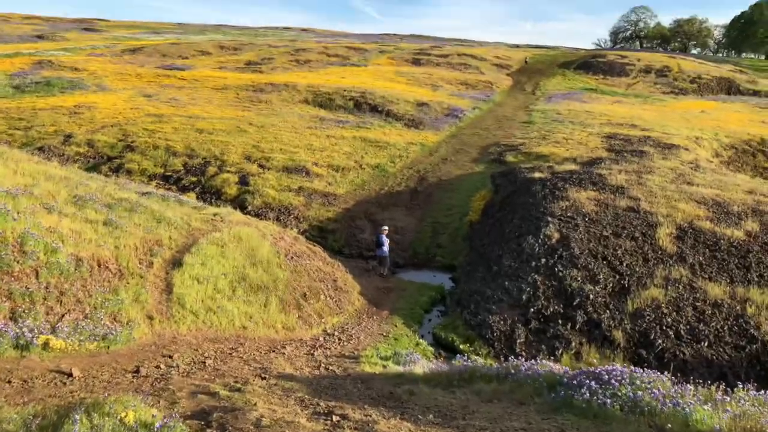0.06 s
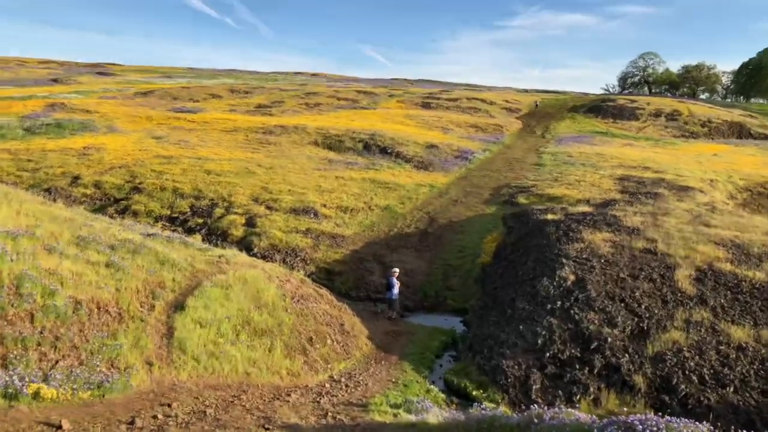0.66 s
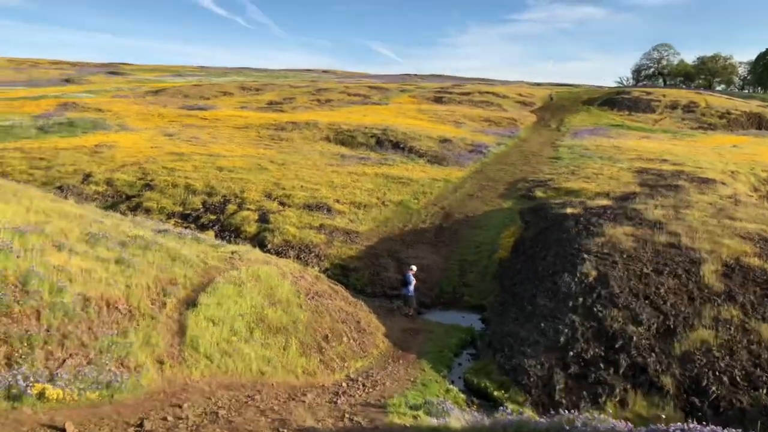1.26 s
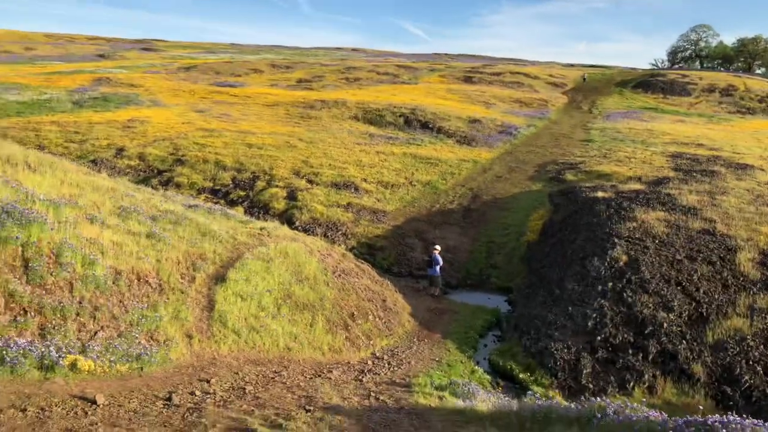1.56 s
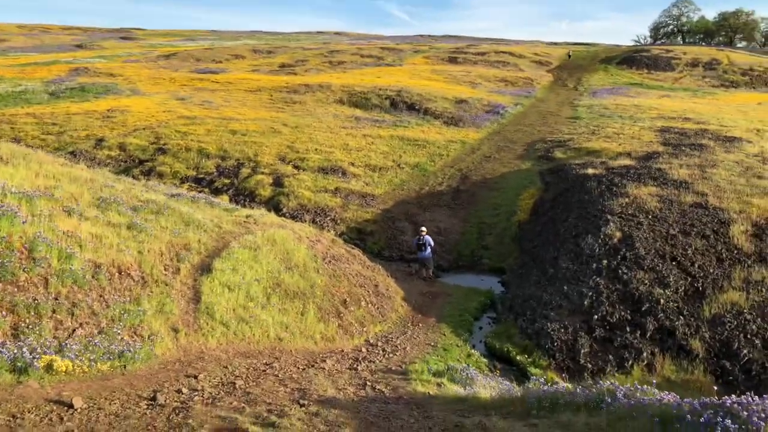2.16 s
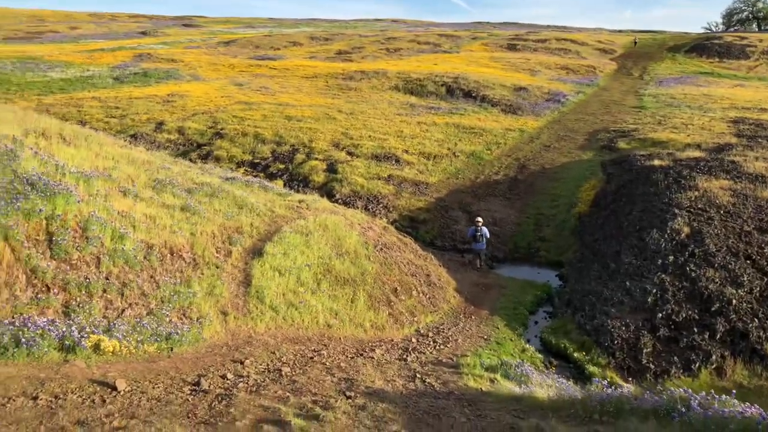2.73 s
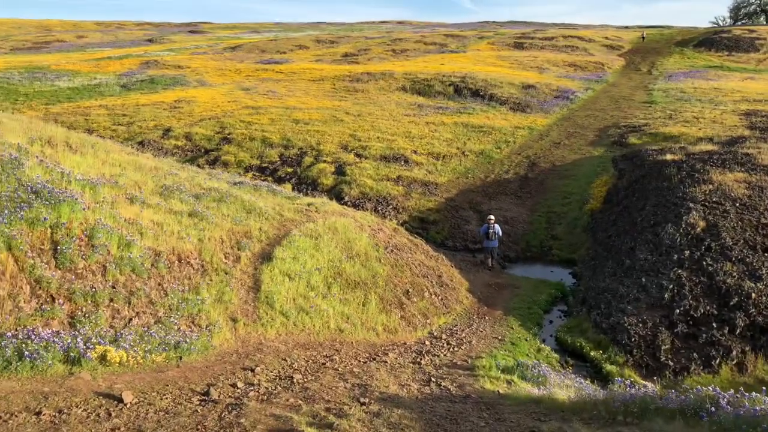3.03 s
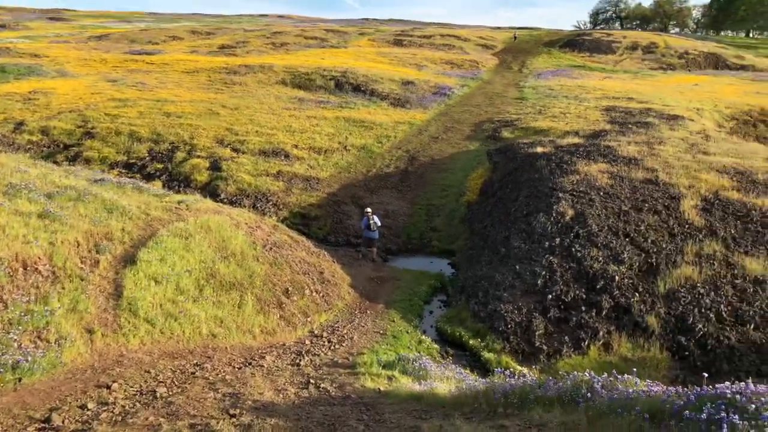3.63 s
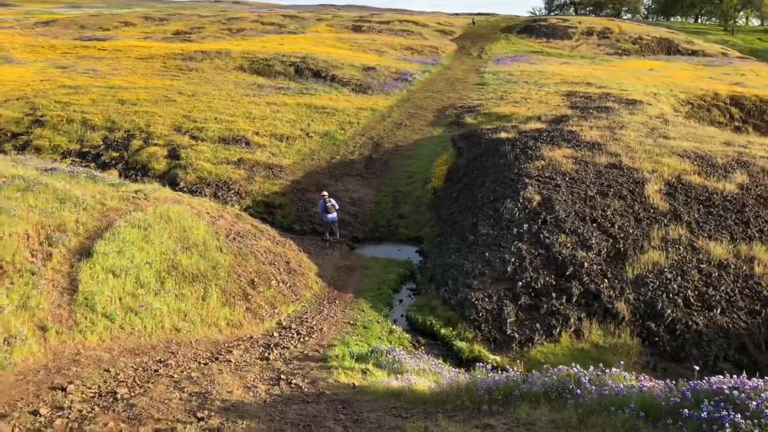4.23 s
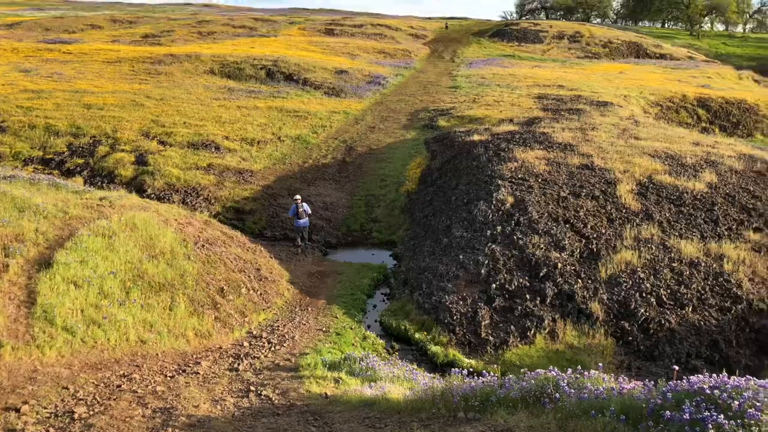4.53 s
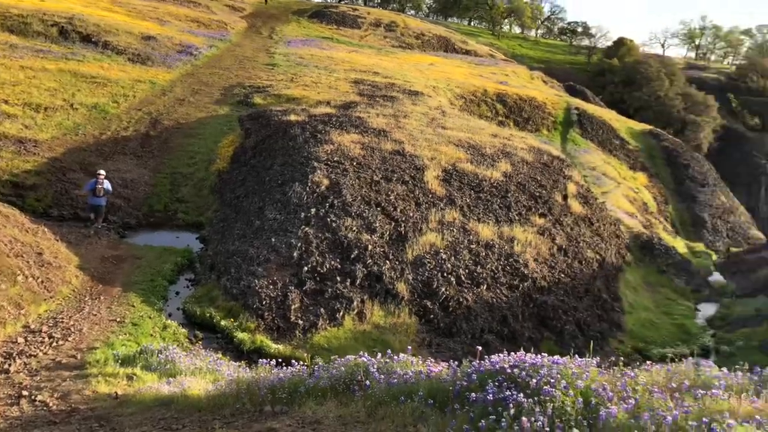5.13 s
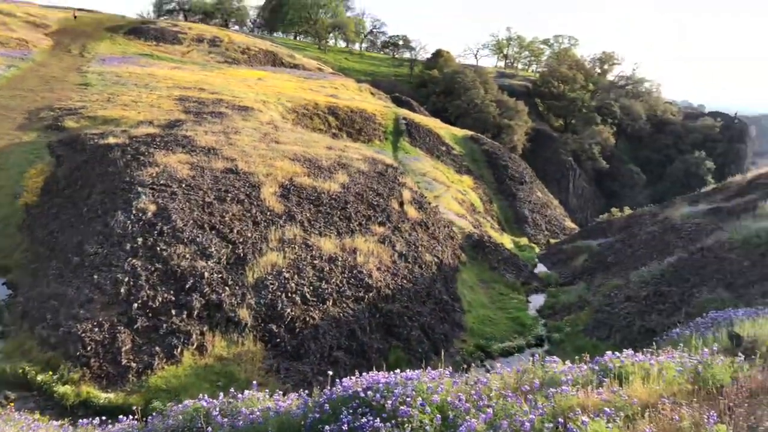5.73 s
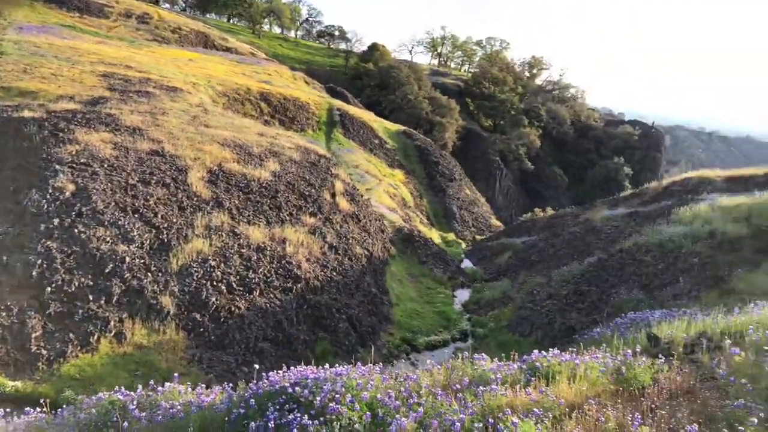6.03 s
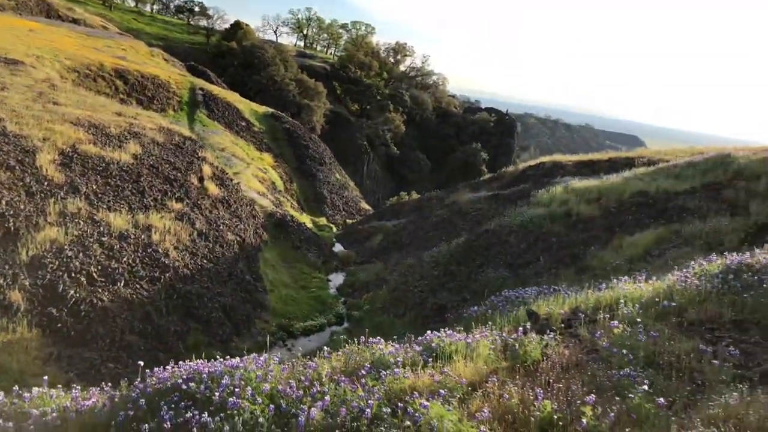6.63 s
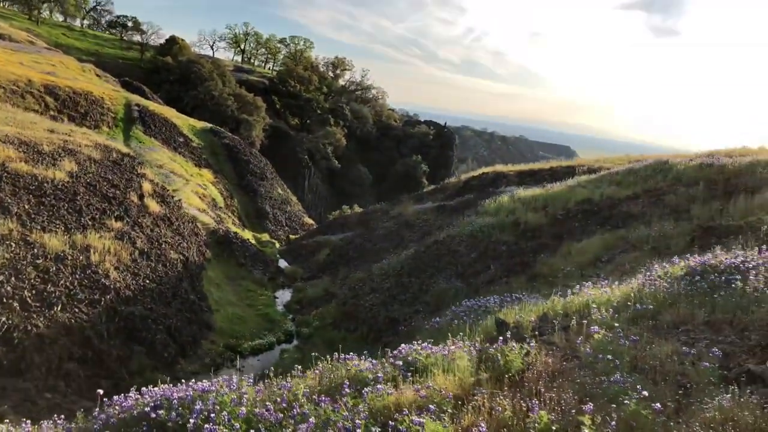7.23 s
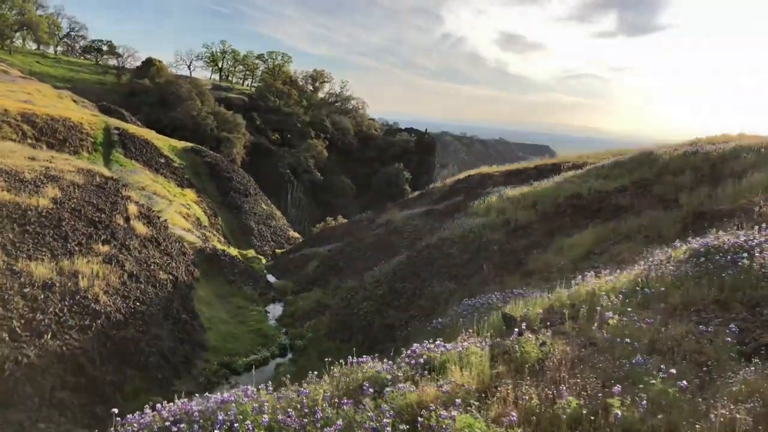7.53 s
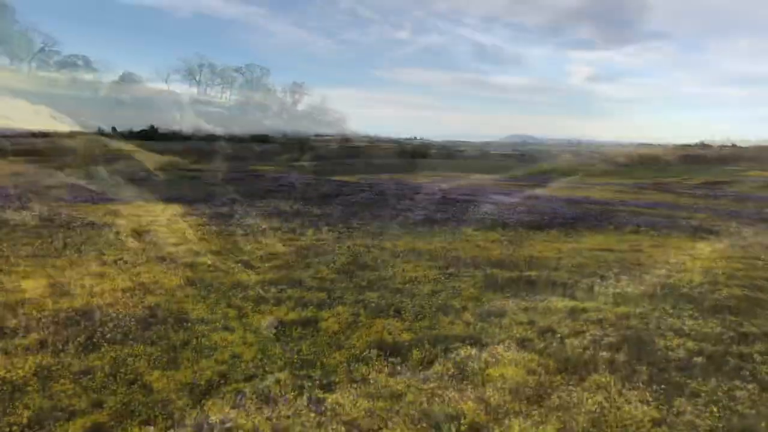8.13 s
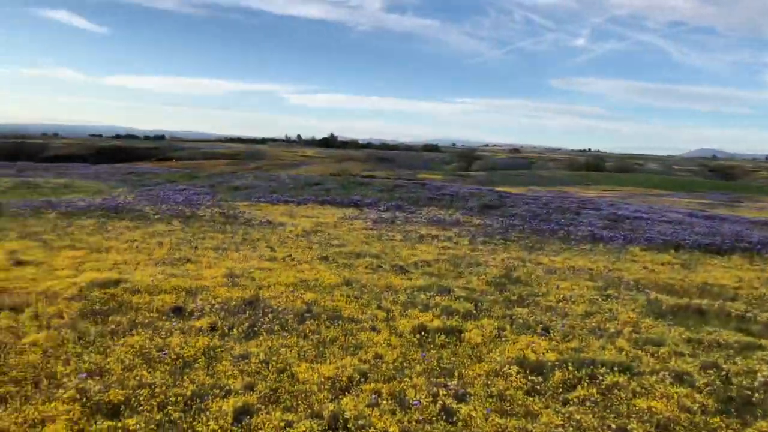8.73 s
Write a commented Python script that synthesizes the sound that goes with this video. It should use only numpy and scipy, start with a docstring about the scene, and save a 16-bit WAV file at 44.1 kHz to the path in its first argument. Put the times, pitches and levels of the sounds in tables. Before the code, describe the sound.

From the start, four tree frogs call close by in turn, about four raspy two-note croaks a second, the second note slightly higher than the first. Behind them a small creek trickles softly and a faint frog chorus swells and fades. The microphone is carried along a stony path: dull, lightly crunching footsteps come about twice a second, with small snaps and rustles of dry grass, clearest around 4.1 and 5.2 seconds. A very faint, thin hiss flutters at the start and near 1.5 and 3 seconds. Brief puffs of wind touch the microphone at about 2 and 3.2 seconds, and a stronger gust comes at 6.5. The croaks grow somewhat louder until about 7 seconds. The steps stop before 8 seconds and the frogs fade just after, with one barely audible, distant bird whistle. Low wind rumble and buffeting build, loudest from 8.2 seconds to the end near 8.9.

```python
"""Tree frogs along a creek

Tree frogs call "rib-bit" in a grassy gully, over a small creek and a fainter chorus. Each note is a
train of short pulses of a tone whose second harmonic is lifted by the vocal sac. Someone carries the
microphone along a stony path through dry grass; wind buffets it more and more toward the end.
Early on a faint, thin hiss flutters about every second and a half; late, a far bird whistles once."""
import sys
import numpy as np
from scipy import signal
from scipy.fft import rfft, irfft, next_fast_len
from scipy.io import wavfile
from scipy.ndimage import uniform_filter1d, map_coordinates

SR = 44100
rng = np.random.default_rng(int(sys.argv[2]) if len(sys.argv) > 2 else 0)


def output_pcm(signal):
    """Save a mono or channel-first signal as 16-bit PCM at the path in sys.argv[1].

    Samples are clipped to [-1, 1] before scaling.
    """
    pcm = np.clip(np.atleast_2d(signal).T, -1, 1) * 32767
    wavfile.write(sys.argv[1], SR, np.round(pcm).astype(np.int16))


N = 392049

# spectrum of the creek and far air: f/Hz, relative density/dB
CREEK_SPECTRUM = [(20, -3), (60, -2), (200, 1), (330, 6), (540, -4), (880, -10), (1270, -10), (1950, -13.5),
                  (3100, -16), (4500, -18), (7000, -23), (9500, -27.5), (15500, -29)]
# loudness of the creek and far air: t/s, level/dB
CREEK_LEVEL = [(0, -59.5), (3.9, -59), (4.6, -60.5), (7.8, -60.5), (8.35, -63), (8.89, -63)]
# spectrum of wind on the microphone: f/Hz, relative density/dB
WIND_SPECTRUM = [(15, -32), (30, -24), (55, 2), (120, 0.5), (180, -4), (260, -14), (400, -37), (700, -47),
                 (1500, -77), (4000, -90)]
# steady wind, rising toward the end: t/s, level/dB
STEADY_WIND = [(0, -63.5), (5.7, -64.5), (6.45, -50), (6.95, -61), (7.4, -52), (8.08, -50), (8.38, -38.5),
               (8.89, -34)]
# gusts on top of it: crest t/s, duration/s, level/dB
GUSTS = [(2.019, .16, -50.5), (3.207, 0.15, -45), (6.53, .24, -37.5), (6.749, 0.1, -50), (7.3, 0.14, -42),
         (7.46, 0.079, -45), (7.77, 0.24, -37.5), (7.951, .11, -40), (8.189, 0.18, -36),
         (8.64, 0.13, -30.5)]
# the hardest buffets: t/s, relative peak/dB
BUFFETS = [(2.023, -38), (3.188, -38), (6.563, -36), (7.75, -31), (7.8, -33), (8.158, -30), (8.225, -23),
           (8.319, -25), (8.39, -26), (8.434, -27), (8.494, -21), (8.531, -21), (8.63, -18.5), (8.861, -26)]
# faint, thin, fluttering hisses: t/s, duration/s, level/dB
HISSES = [(0, .13, -67), (1.49, .31, -69), (2.95, .13, -67)]
# partials of a frog's voice: harmonic number, relative level/dB
FROG_HARMONICS = [(1, -16), (2, 7), (3, -20), (4, -35), (5, -53), (6, -45), (8, -48)]
# loudness of the far chorus: t/s, level/dB
CHORUS_LEVEL = [(0, -58), (.4, -77), (1.58, -61), (2, -76), (2.8, -66), (3.2, -76), (3.75, -64), (4.6, -76),
                (7.3, -80), (8, -69), (8.4, -90)]
# near frogs by name: rib lead/s, rib duration/s, rib f/Hz, bit f/Hz, bit pulse depth (0-1), bit echo/dB
FROG_VOICES = {"leader": (.097, .057, 1240, 1322, .64, -7), "answerer": (.122, .078, 1250, 1320, .66, -7),
               "piper": (.094, 0.0468, 1230, 1330, .2, -14), "low": (.089, .044, 1220, 1244, .35, -10)}
# calls of four frogs taking turns: bit t/s, bit duration/s, rib level/dB, bit level/dB, frog's name
CALLS = [(.212, .051, -52.5, -47.5, "leader"), (.595, .05, -54, -52, "answerer"),
         (0.885, .025, -57, -60, "low"), (1.011, .055, -53, -48.5, "leader"),
         (1.397, .032, -53.5, -50.5, "answerer"), (1.519, .02, -63, -54, "piper"),
         (1.764, .044, -53, -45.5, "leader"), (1.851, .026, -64, -57.5, "low"),
         (2.259, .035, -53.5, -46.5, "answerer"), (2.446, .019, -57, -49, "piper"),
         (2.654, .049, -51.5, -45, "leader"), (2.774, .028, -60, -56, "low"),
         (3.071, .044, -54.5, -51, "answerer"), (3.306, .024, -59.5, -49.5, "piper"),
         (3.473, .042, -49.2, -45.1, "leader"), (3.66, .032, -59, -52.9, "low"),
         (3.921, .037, -54.5, -49, "answerer"), (4.175, .021, -56.5, -48.5, "piper"),
         (4.311, .034, -47.5, -41.5, "leader"), (4.505, .024, -59, -53, "low"),
         (4.923, .055, -47.5, -42.5, "answerer"), (5.01, .019, -60, -48, "piper"),
         (5.368, .026, -58.5, -52, "low"), (5.643, .04, -47, -41, "leader"),
         (5.871, .021, -58, -48.5, "piper"), (6.099, .041, -51.5, -45.5, "answerer"),
         (6.212, .026, -67, -57.5, "low"), (6.475, .032, -48, -39.5, "leader"),
         (6.666, .028, -59, -50.5, "piper"), (7.086, .035, -44, -37, "answerer"),
         (7.571, .03, -58.5, -53, "piper"), (7.766, .043, -46, -42, "leader"),
         (7.949, .021, -62, -56.5, "low"), (8.157, .034, -51.5, -51, "answerer"),
         (8.457, .018, -75, -71.5, "piper"), (8.521, .04, -82, -73, "low")]
# footfalls, about two a second, with a few stumbles: t/s, relative level/dB, relative crunch/dB
STEPS = [(.125, -41, -13), (.675, -32, -13), (.702, -38, -10), (.87, -43, -22), (.952, -37, -12),
         (1.163, -39, -11), (1.208, -42.5, -11), (1.803, -45, -7.5), (2.366, -42, -13), (2.867, -43, -6),
         (2.944, -40.5, -9), (3.482, -37, -11.5), (4.005, -35, -6), (4.519, -46, 1), (5.041, -40, -11.5),
         (5.689, -33.5, -12), (6.234, -41.5, -10), (6.86, -36, -18.5), (7.225, -42, -8),
         (7.516, -35, -16.5)]
# the loudest snaps of dry stalks: t/s, relative peak/dB, relative treble/dB
STALK_SNAPS = [(.151, -49, -24), (.828, -47, -19), (.8974, -52, -10), (1.818, -52, -22), (2.0782, -45, -27),
               (2.8684, -46, -21), (3.058, -47, -28), (3.114, -51.5, 6), (4.135, -42, -16),
               (4.1985, -49, 8), (5.236, -41.5, -16), (5.258, -48, 9), (5.2963, -52, 3),
               (6.9344, -48.5, -24)]
# rustles of grass: t/s, duration/s, level/dB
RUSTLES = [(4.127, 0.075, -60), (5.219, 0.075, -61.5), (8.639, 0.18, -68.5), (8.702, 0.061, -61.5),
           (8.783, 0.049, -62), (0.634, 0.17, -67.5), (1.146, 0.039, -67), (3.553, 0.16, -66),
           (7.9, 0.33, -69)]
# spectrum of a rustle: f/Hz, relative density/dB
RUSTLE_SPECTRUM = [(300, -9), (900, 4.5), (2200, 2.5), (4000, -4), (6200, -4), (8500, -16), (15000, -16)]
# a far bird's note: t/s, duration/s, level/dB, start f/Hz, end f/Hz
BIRD_NOTE = (8.35, .05, -76, 5200, 4400)


def gain_of(db):
    """Amplitude ratio: a factor of ten for every 20 dB."""
    return 10 ** (np.asarray(db) / 20)


def unit_rms(x):
    """Normalisation to an rms of 1."""
    return x / np.sqrt(np.mean(x ** 2) + 1e-20)


def add(mix, s, sound):
    """Superposition: a sound joins the mix at s seconds."""
    part = mix[max(round(s * SR), 0):][:len(sound)]
    part += sound[:len(part)]


def curve(rows):
    """Linear interpolation of (t/s, value) rows over the scene."""
    return np.interp(np.arange(N) / SR, *np.transpose(rows))


def noise(spectrum, size):
    """Spectral shaping: white noise weighted by (f/Hz, level/dB) rows, at an rms of 1."""
    hz, db = np.transpose(spectrum)
    full = next_fast_len(size)
    shape = gain_of(np.interp(np.log(np.fft.rfftfreq(full, 1 / SR) + 1), np.log(hz), db))
    return unit_rms(irfft(rfft(rng.standard_normal(full)) * shape, full)[:size])


def wander(size, per_s):
    """Random drift of rms about 1: a spline through per_s Gaussian values a second."""
    at = np.arange(size) / SR * per_s + 1 + rng.random()
    return map_coordinates(rng.standard_normal(int(at[-1]) + 4), [at], order=2, mode="nearest")


def band(x, low_hz, high_hz, order=2):
    """Causal Butterworth band-pass."""
    sections = signal.butter(order, [low_hz, min(high_hz, SR / 2 - 1)], "band", fs=SR, output="sos")
    return signal.sosfilt(sections, x)


def creek(gurgle_top_hz=1100):
    """Random modulation of noise, band by band: the water's low bands gurgle, its hiss is smoother."""
    hz, _, spectra = signal.stft(noise(CREEK_SPECTRUM, N), SR, nperseg=1024)
    patches = uniform_filter1d(rng.standard_normal(spectra.shape), size=4, axis=0)
    patches = unit_rms(uniform_filter1d(patches, size=5, axis=1))
    gurgle_db = 1.04 + 2.5 * np.exp(-(hz[:, None] / gurgle_top_hz) ** 2)
    wash = signal.istft(spectra * gain_of(gurgle_db * patches), SR, nperseg=1024)[1][:N]
    return unit_rms(wash) * gain_of(curve(CREEK_LEVEL) + .9 * wander(N, 12))


def wind_level():
    """Amplitude envelope of the wind: the steady part plus a smooth swell for each gust."""
    level = gain_of(curve(STEADY_WIND))
    for s, length, db in GUSTS:
        add(level, s - length / 2, gain_of(db) * np.hanning(int(length * SR)))
    return level


def damped_swing(excess_hz, end_hz, fall_s, decay_s, rough):
    """Damped oscillation: a push of air whose unsteady frequency sinks as it dies."""
    t = np.arange(SR // 12) / SR
    hz = (end_hz + excess_hz * np.exp(-t / fall_s)) * gain_of(rough * wander(len(t), 514))
    swing = np.sin(2 * np.pi * np.cumsum(hz) / SR) * np.exp(-t / decay_s) * (1 - np.exp(-t / 0.0021))
    return swing / abs(swing).max()


def buffet():
    """Pressure transient at the microphone: a round push of air with a short flutter."""
    push = damped_swing(excess_hz=272, end_hz=116.6, fall_s=0.0053, decay_s=0.013, rough=2.42)
    t = np.arange(len(push)) / SR
    flutter = band(rng.standard_normal(len(t)) * np.exp(-t / 0.0078), 256, 580, order=3)
    return push + gain_of(-8.5) * flutter / abs(flutter).max()


def wind(eddies=150, onset_db=-40):
    """Turbulence: the stronger the wind, the more its rumble breaks into separate buffets."""
    rumble, level = noise(WIND_SPECTRUM, N), wind_level()
    rumble /= np.sqrt(uniform_filter1d(rumble ** 2, size=3000))  # flatten the noise's own envelope
    rumble *= level * gain_of(-2.2 + 3.7 * wander(N, 45))
    buffets = np.zeros(N)
    for s, db in BUFFETS:
        add(buffets, s, gain_of(db - 2.0) * buffet())
    for at in ((np.arange(eddies) + rng.random(eddies)) * N / eddies).astype(int):
        turbulence = level[at] / (level[at] + gain_of(onset_db))
        add(buffets, at / SR, gain_of(0.5) * level[at] * turbulence * buffet())
    return rumble + band(buffets, 30, 660, order=3)


def thin_hisses(pulses_per_s=90):
    """Amplitude modulation of narrow-band noise: faint, fluttering hisses near 4.6 kHz."""
    out = np.zeros(N)
    for s, length, db in HISSES:
        t = np.arange(int(length * SR)) / SR
        pulses = 1 + .5 * np.sin(2 * np.pi * pulses_per_s * t)
        hiss = band(rng.standard_normal(len(t)), 4350, 4850)
        add(out, s, gain_of(db) * unit_rms(hiss * pulses * signal.windows.tukey(len(t), .6)))
    return out


def frog_note(length, hz, depth, pulses_per_s, glide, rasp, puff_db):
    """Pulse modulation of a rising harmonic tone: each pulse starts hard and rich, then rounds off."""
    progress = np.linspace(0, 1, int(length * SR))
    size = len(progress)
    pulse_rate = pulses_per_s * (1 + .035 * rng.standard_normal() + .03 * wander(size, 80))
    pulse_count = np.cumsum(pulse_rate) / SR
    pulse_phase = pulse_count % 1
    pulse = np.sin(np.pi * pulse_phase ** 0.48) ** 2
    detune = rng.standard_normal(size=64)[pulse_count.astype(int)]  # each pulse has its own pitch
    bend = 0.023 * (.5 - pulse_phase) + .017 * detune
    pitch = hz * (1 + glide * (progress - .5) + depth * bend + rasp * wander(size, 502))
    cycles = np.cumsum(pitch) / SR + rng.random()
    richness = 1 + 4.1 * depth * (1 - 2 * pulse_phase) * (1.3 - progress)  # greatest in early pulses
    tone = sum(gain_of(db) * (1 if k == 2 else richness) * np.sin(2 * np.pi * k * cycles)
               for k, db in FROG_HARMONICS)
    # the vocal folds snap open noisily
    puffs = unit_rms(band(rng.standard_normal(size), 2400, 4400)) * np.exp(-pulse_phase / .5)
    voice = tone * (1 - depth + depth * pulse) + gain_of(puff_db) * depth * puffs
    return progress, voice * gain_of(1.26 * wander(size, 113))


def rib(length, hz):
    """Slow attack, quick decay: the deeply pulsed first note of a call."""
    progress, sound = frog_note(length, hz, depth=0.89, pulses_per_s=133,
                                glide=0.065, rasp=0.0333, puff_db=-13.5)
    return unit_rms(sound * np.interp(progress, [0, .08, .62, .85, 1], [0.1, 0.15, 1, .75, 0.0]))


def gully(x, t60, wet_db):
    """Reverberation: scattered reflections from rocks and banks fall by 60 dB in t60 seconds."""
    t = np.arange(SR // 2) / SR
    taps = rng.standard_normal(len(t)) * (rng.random(len(t)) < 2000 / SR)
    taps *= (t > .004) * gain_of(-60 * t / t60)
    return x + gain_of(wet_db) * signal.oaconvolve(x, taps / np.linalg.norm(taps))[:len(x)]


def chorus(count=200):
    """Incoherent summation: the notes of many far frogs, blurred by reverberation."""
    out = np.zeros(N)
    for when, pitch, strength in rng.random((count, 3)):
        add(out, when * N / SR, gain_of(10 * strength) * rib(0.0803, 1170 + 130 * pitch))
    return unit_rms(gully(out, t60=0.13, wet_db=-2.0)) * gain_of(curve(CHORUS_LEVEL))


def echoing(sound, t60, wet_db):
    """Reverberation at constant energy: a note is spread out by its own echoes from the gully."""
    wet = gully(np.pad(sound, (0, SR // 2)), t60, wet_db)
    return wet * np.linalg.norm(sound) / np.linalg.norm(wet)


def bit(length, hz, depth):
    """Quick attack: the second note of a call, whose rasp grows with the depth of its pulsing."""
    progress, sound = frog_note(length, hz, depth, pulses_per_s=122,
                                glide=0.043, rasp=0.047 * depth, puff_db=-13.0)
    return unit_rms(sound * np.interp(progress, [0, .08, .45, .78, 1], [0.25, 0.75, 0.97, 0.72, 0.015]))


def near_frogs():
    """Antiphony: four frogs call "rib-bit" in turn, the second note a little higher than the first."""
    out = np.zeros(N)
    for s, bit_s, rib_db, bit_db, frog in CALLS:
        lead_s, rib_s, rib_hz, bit_hz, depth, echo_db = FROG_VOICES[frog]
        tuning = 1 + .004 * rng.standard_normal()
        first = echoing(rib(rib_s, rib_hz * tuning), t60=0.12, wet_db=-1.5)
        second = echoing(bit(bit_s, bit_hz * tuning, depth), t60=0.13, wet_db=echo_db)
        add(out, s - lead_s, gain_of(rib_db) * first)
        add(out, s, gain_of(bit_db) * second)
    return out


def footfall(crunch_db):
    """Impact and friction: a dull thud, and small stones grinding in clumps under it."""
    thud = damped_swing(excess_hz=705, end_hz=180.6, fall_s=0.00204, decay_s=0.0099, rough=2.83)
    t = np.arange(len(thud)) / SR
    stones = rng.standard_normal(len(t)) * (rng.random(len(t)) < 2500 / SR)
    clumps = gain_of(5.9 * wander(len(t), 187))
    pressure = (1 - np.exp(-t / 0.0042)) * (np.exp(-t / 0.0037) + 0.046 * np.exp(-t / 0.041))
    crunch = band(stones * clumps * pressure, 450, 1550)
    return thud + gain_of(crunch_db + 11) * crunch / abs(crunch).max()


def snap(treble_db):
    """Brittle fracture: grit or a dry stalk breaks with a burst and a brief trail of crackles."""
    t = np.arange(SR // 20) / SR
    crackles = 0.48 * np.exp(-t / 0.0098) * (rng.random(len(t)) < 5000 / SR)
    burst = (1 - np.exp(-t / 0.00031)) * np.exp(-t / 0.0014)
    fracture = rng.standard_normal(len(t)) * (burst + crackles)
    sound = band(fracture, 1750, 3460, order=1) + gain_of(treble_db + 0.5) * band(fracture, 4500, 22900)
    return sound / abs(sound).max()


def walking(until_s, loose_stones=55):
    """Successive impacts: heel, grit and sole at each step, with loose stones shifting in between."""
    out = np.zeros(N)
    for s, db, crunch_db in STEPS:
        add(out, s, gain_of(db - 2.5) * footfall(crunch_db))  # heel
        add(out, s, gain_of(db + crunch_db - 1) * snap(treble_db=-26))  # grit
        add(out, s + .032, gain_of(db - 12.5) * footfall(crunch_db=-8.5))  # sole
    for when, strength in rng.random((loose_stones, 2)):
        add(out, when * until_s, gain_of(-66.0 + 10 * strength) * footfall(crunch_db=-2.5))
    return out


def dry_grass(until_s, faint_snaps=150):
    """Fracture and friction: stalks snap and rustle close by, with faint crackles between them."""
    out = np.zeros(N)
    for s, db, treble_db in STALK_SNAPS:
        add(out, s, gain_of(db + 6.5) * snap(treble_db))
    for when, strength in rng.random((faint_snaps, 2)):
        add(out, when * until_s, gain_of(-57 + 10 * strength ** 2) * snap(treble_db=-17))
    for s, length, db in RUSTLES:
        size = int(length * SR)
        rustle = noise(RUSTLE_SPECTRUM, size) * gain_of(4.2 * wander(size, 250))
        add(out, s, gain_of(db) * unit_rms(rustle * signal.windows.tukey(size, .7)))
    return out


def bird():
    """Linear frequency sweep: one faint, falling whistle echoes in the gully."""
    s, length, db, start_hz, end_hz = BIRD_NOTE
    hz = np.linspace(start_hz, end_hz, int(length * SR))
    whistle = np.sin(2 * np.pi * np.cumsum(hz) / SR) * np.hanning(len(hz))
    out = np.zeros(N)
    add(out, s, gain_of(db) * unit_rms(whistle))
    return gully(out, t60=.2, wet_db=-4)


def scene(walk_end_s=7.85):
    """Superposition of all the sources at one microphone."""
    return (near_frogs() + chorus() + creek() + wind()
            + walking(walk_end_s) + dry_grass(walk_end_s) + bird() + thin_hisses())[None]


def record(dry):
    """Band limiting: a linear-phase low-pass at 15.9 kHz."""
    low_pass = signal.firwin(511, 15900, window=("kaiser", 9), fs=SR)
    return signal.oaconvolve(dry, low_pass[None], "same")


dry = scene()
out = record(dry)
output_pcm(out)
```